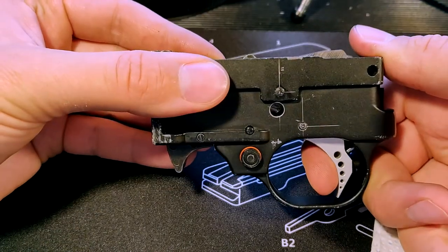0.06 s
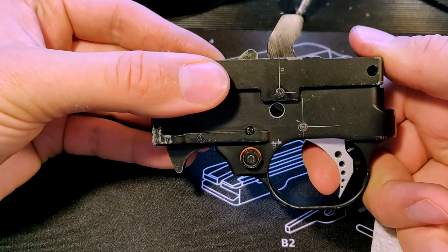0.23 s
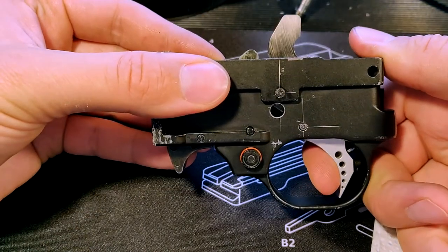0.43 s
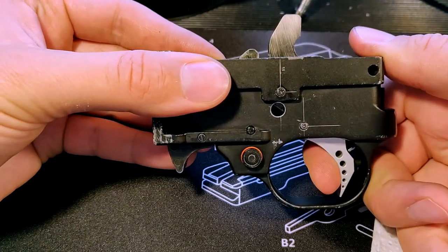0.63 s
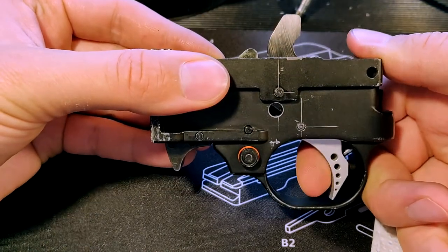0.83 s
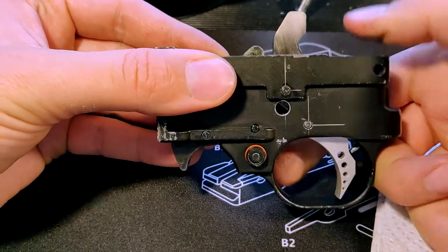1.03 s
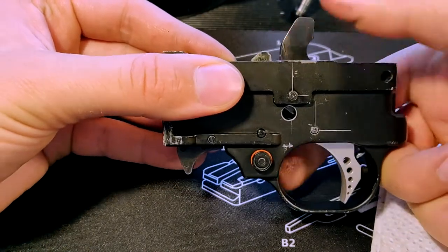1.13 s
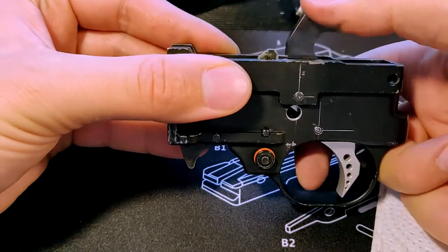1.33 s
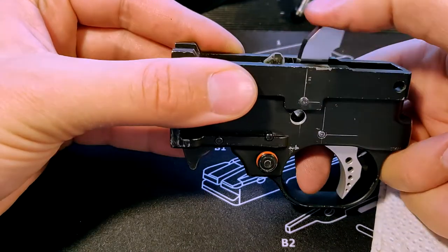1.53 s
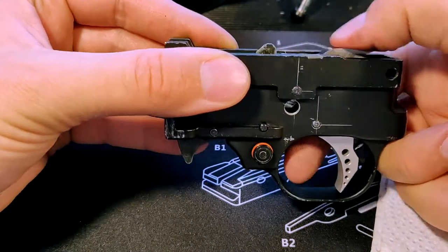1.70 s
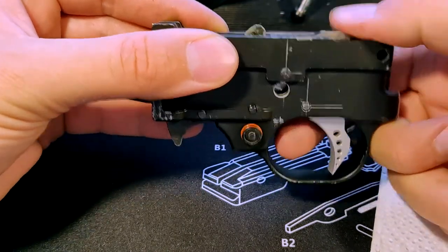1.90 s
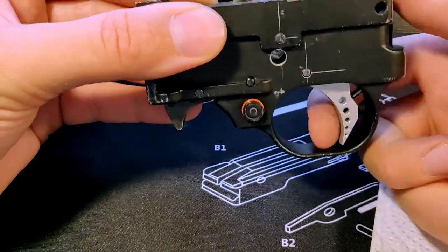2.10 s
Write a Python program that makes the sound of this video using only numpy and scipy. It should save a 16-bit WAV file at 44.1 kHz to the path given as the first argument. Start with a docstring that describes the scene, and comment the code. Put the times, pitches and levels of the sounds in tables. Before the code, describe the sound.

Sharp steel hammer snap, chattering and overloading the close microphone, with a short room echo; after a quiet pause, soft handling, a crisp cocking click, a lower reset click and a dull grip bump over faint hiss.

```python
"""A hammer in a small steel trigger mechanism falls, chatters on its frame and overloads the recorder.
Held in the hands close to the microphone in a small room, it is then cocked with small ticks and a
latching click, and the trigger resets. Each metal contact is a short noise burst plus ringing sine waves.
Skin sliding on metal and handling are shaped noise. Hum is two sine waves; hiss, rumble and slow
air pressure are noise."""
import sys
import numpy as np
from scipy import signal
from scipy.fft import rfft, irfft, next_fast_len
from scipy.io import wavfile

SR = 44100
rng = np.random.default_rng(int(sys.argv[2]) if len(sys.argv) > 2 else 0)


def store_pcm(level_fs):
    """Save levels as 16-bit WAV."""
    pcm = np.round(np.clip(level_fs, -1, 1) * 32767).astype(np.int16)
    wavfile.write(sys.argv[1], SR, np.atleast_2d(pcm).T)


N = 94815  # length in samples, about 2.15 s

# In all "contacts" tables, brightness tilts the sound up (+) or down (-) around 6000 Hz.
# Mode levels are starting points: brightness and a random change at each contact shift them.

# Steady hiss. Each row: frequency in Hz, relative level in dB.
HISS_SPECTRUM = [(100, 6), (400, 7), (700, 6.5), (1200, 4.5), (2200, -1.5), (4000, -2.5), (7000, -3.5),
                 (11000, -0.5), (13000, -4), (15700, -5)]
# Low room rumble. Each row: frequency in Hz, relative level in dB.
RUMBLE_SPECTRUM = [(15, -1), (30, 5), (55, -1.5), (80, -11.5), (130, -20), (220, -22), (500, -49.5)]
# Mains hum tones. Each row: frequency in Hz, rms level in dB.
HUM_TONES = [(49.8, -49), (100, -64.5)]
# Strength of slow air pressure on the microphone. Each row: time in seconds, level in dB.
AIR_LEVEL = [(0, -38), (1.3, -37), (1.55, -39.5), (1.7, -27), (1.85, -24.5), (2.0, -41), (2.15, -42)]
# Colour of that air pressure. Each row: frequency in Hz, relative level in dB.
AIR_SPECTRUM = [(1, -6), (4, 2.5), (10, -21.5), (20, -41), (60, -70), (200, -100)]
# Strength of the low handling noise. Each row: time in seconds, level in dB.
HANDLING_LEVEL = [(0, -65.5), (.5, -62.5), (.85, -59), (1.1, -56), (1.35, -56.5), (1.6, -64), (2.15, -63)]
# Colour of the handling noise. Each row: frequency in Hz, relative level in dB.
HANDLING_SPECTRUM = [(100, -24.5), (180, -5.5), (220, -5.5), (285, 3.5), (340, -6.5), (430, -17),
                     (1500, -42)]

# Hammer release, blow and rebounds. Each row: start in seconds, level in dB, brightness in dB per octave.
HAMMER_CONTACTS = [(.1977, -20, -2.5), (.2028, 0, 0.5), (.2092, 3.5, 1), (.2149, 3, 2.5), (.2205, -3.5, -2)]
# Dense clang of the frame. Each row: frequency in Hz, relative level in dB.
FRAME_CLANG = [(60, -18.5), (350, -18.5), (750, -24.5), (1300, -20), (1700, -21), (2400, -18.5),
               (3100, -13), (3600, -5), (4200, -11.5), (5200, -7.5), (7500, -8.5), (10000, -6), (11900, 3),
               (13400, -6), (15500, -6.5)]
# Ring of the hammer and the frame it strikes, strongest near 3.6 kHz. Each row: frequency in Hz, level in dB,
# time to fall 60 dB in seconds.
HAMMER_RING = [(2870, -7.5, .09), (3532, 3, .1), (3630, 5.5, 0.05), (3994, -13, .2), (5749, -14, .18),
               (6342, -13, .13), (8730, -8, .14), (11220, -7, .15), (12200, -4, 0.14), (11640, -7, .17),
               (12030, -3, .17), (12210, -5, .19), (12930, -13.5, 0.14), (14900, -8, .15)]
# The blow jolts the whole frame. Each row: start in seconds, level in dB, brightness in dB per octave.
JOLT_CONTACTS = [(.209, -36, -1)]
# Colour of the jolt. Each row: frequency in Hz, relative level in dB.
JOLT_SPECTRUM = [(20, -8.5), (45, -0.5), (120, -3), (250, -9), (600, -28.5), (2000, -61)]
# Low ring of the frame in the hands. Each row: frequency in Hz, level in dB, time to fall 60 dB in seconds.
JOLT_RING = [(60, -0.5, .25), (123, -3, .2)]
# Spring ping as its load changes. Each row: start in seconds, level in dB, brightness in dB per octave.
SPRING_CONTACTS = [(.7615, -49, 4)]
# Colour of the ping's noise burst. Each row: frequency in Hz, relative level in dB.
SPRING_SPECTRUM = [(1000, -5), (2800, -7), (3900, 0), (5200, -9), (7600, -9), (10000, -19), (15000, -10)]
# Ring of the spring. Each row: frequency in Hz, level in dB, time to fall 60 dB in seconds.
SPRING_RING = [(2030, 9.5, 0.036), (3580, 3.5, 0.055), (4120, -4, .04), (5740, -5.5, .08)]
# Skin sliding over metal. Each row: middle in seconds, width (standard deviation) in seconds,
# level at the middle in dB, brightness in dB per octave.
SKIN_RUBS = [(0.997, 0.019, -54, -5.5), (1.038, 0.021, -52.5, 0), (1.2, 0.14, -64.5, -2.5),
             (1.68, 0.036, -59, -0.5), (1.815, 0.039, -56, 1.5), (1.99, 0.03, -60.5, -7),
             (2.107, 0.012, -54, 0.5)]
# Colour of the sliding skin. Each row: frequency in Hz, relative level in dB.
SKIN_SPECTRUM = [(300, -20), (650, -6.5), (1050, 3.5), (2500, -2.5), (4000, 0), (7500, -2), (11500, 0.5),
                 (15500, -10.5)]
# Soft tick as the hammer starts to turn. Each row: start in seconds, level in dB, brightness in dB per octave.
PIVOT_CONTACTS = [(1.4525, -49.5, 1)]
# Colour of the pivot tick. Each row: frequency in Hz, relative level in dB.
PIVOT_SPECTRUM = [(1000, -22), (3000, -15), (3900, 6), (4700, -8), (5600, -16), (15000, -22)]
# Ring of the pivot. Each row: frequency in Hz, level in dB, time to fall 60 dB in seconds.
PIVOT_RING = [(3580, 3, .06), (4200, -6, 0.045), (4600, -9, .03)]
# Sear (catch) clicks in cocking. Each row: start in seconds, level in dB, brightness in dB per octave.
SEAR_CONTACTS = [(1.5435, -44, -1.5), (1.586, -51, -5), (1.6125, -54, -3.5), (1.6672, -41, -4.5),
                 (1.6835, -46, -1.5), (1.6995, -36, 6.5), (1.7137, -22, 1), (1.7215, -30, 4.5)]
# Colour of the sear clicks. Each row: frequency in Hz, relative level in dB.
SEAR_SPECTRUM = [(150, -24), (550, -30), (850, -5), (1400, -9.5), (2500, -7), (3600, 0), (5000, 4.5),
                 (6700, 2), (7600, -4.5), (10300, -4.5), (12000, -6), (14500, -10), (16000, -17)]
# Ring of the sear. Each row: frequency in Hz, level in dB, time to fall 60 dB in seconds.
SEAR_RING = [(2117, 3, 0.027), (2490, 8, 0.014), (4150, 2, 0.084), (4950, 9, 0.039), (5470, 1, .04),
             (5660, -6, .045), (6700, 1, .045), (6780, -0.5, 0.053)]
# Clicks of the trigger resetting. Each row: start in seconds, level in dB, brightness in dB per octave.
TRIGGER_CONTACTS = [(1.9019, -20, -1.5), (1.9098, -33.5, 2.5), (1.925, -44, 18)]
# Colour of the trigger clicks. Each row: frequency in Hz, relative level in dB.
TRIGGER_SPECTRUM = [(150, -7), (550, -23), (900, 2.5), (1500, -17.5), (2000, -3.5), (2800, 0), (3700, 9.5),
                    (4700, -8), (6000, -9), (7500, -16), (9000, -11.5), (11700, -17.5), (15000, -34)]
# Ring of the trigger. Each row: frequency in Hz, level in dB, time to fall 60 dB in seconds.
TRIGGER_RING = [(850, -0.5, 0.021), (2090, -19, 0.033), (2950, 1, 0.024), (3380, -14, 0.026),
                (3600, 5.5, 0.04), (3927, -7, 0.046), (5730, -18, 0.094)]
# Dull bump as the grip shifts. Each row: start in seconds, level in dB, brightness in dB per octave.
BUMP_CONTACTS = [(2.031, -40, 1)]
# Colour of the bump. Each row: frequency in Hz, relative level in dB.
BUMP_SPECTRUM = [(100, -18), (290, -1.5), (550, -2.5), (800, -13), (1150, -5), (2200, -34), (4500, -27.5),
                 (12000, -32.5)]
# Ring of the bump. Each row: frequency in Hz, level in dB, time to fall 60 dB in seconds.
BUMP_RING = [(277, 2, .07), (327, 4.5, 0.064), (476, -1.5, 0.021), (1110, -20, 0.055), (1650, -20, 0.03)]

# How fast the room's echo dies. Each row: frequency in Hz, time to fall 60 dB in seconds.
ROOM_DECAY = [(200, 0.13), (500, 0.11), (1500, 0.24), (4000, 0.25), (9000, .245), (12500, 0.21),
              (15500, .235)]
# Colour of the room's echo. Each row: frequency in Hz, relative level in dB.
ROOM_SPECTRUM = [(200, -5.5), (600, -3.5), (1200, 1), (4000, -1.5), (12000, -1), (16000, -2)]

ROOM_BUILD_S = 0.0034  # time for the diffuse echo to build up
WALL_DELAY_S, WALL_DB = 0.0077, -11.5  # echo from one near wall
CRACK_DB, CRACK_T60_S = -5, 0.0018  # first instant of each contact, added to its clang
CLIP_TOP, CLIP_KNEE = 0.98, 7.6  # recorder's ceiling; a higher knee bends more sharply
TOP_HZ, EDGE_HZ = 15900, 250  # highest frequency kept, and the width of the fade just below it


def amp(db):
    """Turn decibels into a gain."""
    return 10 ** (np.asarray(db) / 20)


def unit(x):
    """Scale a sound to an average (rms) strength of 1."""
    return x / np.sqrt(np.mean(x ** 2) + 1e-20)


def along(points, hz):
    """Read a (frequency, value) curve on a logarithmic frequency axis."""
    f, v = np.transpose(points)
    return np.interp(np.log(hz + 1), np.log(f + 1), v)


def curve(rows):
    """Join (seconds, value) points into one value per sample."""
    return np.interp(np.arange(N) / SR, *np.transpose(rows))


def filtered(x, response):
    """Multiply each frequency in a sound by the given response."""
    size = next_fast_len(len(x) + 8192)
    hz = np.fft.rfftfreq(size, 1 / SR)
    return irfft(rfft(x, size) * response(hz), size)[:len(x)]


def tilt(hz, slope):
    """Give a brightness slope in dB around 6000 Hz, level below 500 Hz."""
    return slope * np.log2(np.maximum(hz, 500) / 6000)


def noise(spectrum, slope=0, size=N):
    """Colour random noise with a spectrum and a brightness slope, at rms 1."""
    white = rng.standard_normal(size)
    return unit(filtered(white, lambda hz: amp(along(spectrum, hz) + tilt(hz, slope))))


def room(x, wet_db):
    """Add one near-wall echo and a diffuse tail whose frequencies die away at different speeds."""
    hz, t, z = signal.stft(rng.standard_normal(SR // 2), SR, nperseg=256)
    decay_db = along(ROOM_SPECTRUM, hz)[:, None] - 60 * t / along(ROOM_DECAY, hz)[:, None]
    tail = signal.istft(z * amp(decay_db), SR, nperseg=256)[1]
    tail *= 1 - np.exp(-np.arange(len(tail)) / SR / ROOM_BUILD_S)
    tail /= np.linalg.norm(tail)
    # Turning the phase in step with frequency delays the sound.
    wall = amp(WALL_DB) * filtered(x, lambda f: np.exp(-2j * np.pi * f * WALL_DELAY_S))
    return x + wall + amp(wet_db) * signal.fftconvolve(x, tail)[:len(x)]


def strikes(contacts, spectrum, modes, t60, ring_db, wet_db):
    """Make each contact crack and clang as fading noise, and ring the part as fading sine waves."""
    out = np.zeros(N + SR)
    t = np.arange(SR // 2) / SR
    fade = amp(-60 * t / t60) + amp(CRACK_DB - 60 * t / CRACK_T60_S)
    for start, db, slope in contacts:
        clang = noise(spectrum, slope, size=len(t)) * fade
        ring = np.zeros(len(t))
        for hz, level, life in modes:
            mode_db = level + tilt(hz, slope) + rng.normal(0, 4)  # each contact rings a little differently
            ring += amp(mode_db - 60 * t / life) * np.sin(2 * np.pi * (hz * t + rng.random()))
        out[round(start * SR):][:len(t)] += amp(db) * room(clang + amp(ring_db) * ring, wet_db)
    return out[:N]


def mains_hum():
    """Steady sine waves with random starting phases."""
    t = np.arange(N) / SR
    hum = np.zeros(N)
    for hz, db in HUM_TONES:
        hum += amp(db) * np.sqrt(2) * np.sin(2 * np.pi * (hz * t + rng.random()))  # root 2: rms to peak
    return hum


def hiss():
    """Steady coloured noise."""
    return amp(-62) * noise(HISS_SPECTRUM)


def rumble():
    """Steady low noise of the room."""
    return amp(-47.5) * noise(RUMBLE_SPECTRUM)


def air_pressure():
    """Slow air pressure on the microphone, as very low noise of changing strength."""
    return amp(curve(AIR_LEVEL)) * noise(AIR_SPECTRUM)


def handling():
    """Low noise of the hands, slowly changing in strength."""
    return amp(curve(HANDLING_LEVEL)) * noise(HANDLING_SPECTRUM)


def hammer():
    """The hammer is released, hits the frame and rebounds, making metal clang and ring."""
    return strikes(HAMMER_CONTACTS, FRAME_CLANG, HAMMER_RING, t60=0.032, ring_db=-22, wet_db=-3)


def frame_jolt():
    """The blow shakes the whole frame in the hands as a low thud and ring."""
    return strikes(JOLT_CONTACTS, JOLT_SPECTRUM, JOLT_RING, t60=0.2, ring_db=-3, wet_db=-8.5)


def spring_ping():
    """A spring rings faintly as the load on it changes."""
    return strikes(SPRING_CONTACTS, SPRING_SPECTRUM, SPRING_RING, t60=0.038, ring_db=-6, wet_db=-6)


def skin_rubs():
    """Skin slides over metal as noise that swells and fades in bell shapes."""
    t = np.arange(N) / SR
    rubs = np.zeros(N)
    for middle, width, db, slope in SKIN_RUBS:
        swell = np.exp(-0.5 * ((t - middle) / width) ** 2)
        rubs += amp(db) * swell * noise(SKIN_SPECTRUM, slope)
    return rubs


def pivot_tick():
    """The hammer's pivot ticks and rings softly as it starts to turn."""
    return strikes(PIVOT_CONTACTS, PIVOT_SPECTRUM, PIVOT_RING, t60=0.021, ring_db=-8.5, wet_db=-7)


def sear_clicks():
    """The sear, a small catch, clicks and rings while the hammer is cocked."""
    return strikes(SEAR_CONTACTS, SEAR_SPECTRUM, SEAR_RING, t60=0.022, ring_db=-18.5, wet_db=-7.5)


def trigger_reset():
    """The trigger clicks and rings briefly as it resets."""
    return strikes(TRIGGER_CONTACTS, TRIGGER_SPECTRUM, TRIGGER_RING, t60=0.014, ring_db=-16.5, wet_db=-8.5)


def grip_bump():
    """The shifting grip gives a dull bump and a short low ring."""
    return strikes(BUMP_CONTACTS, BUMP_SPECTRUM, BUMP_RING, t60=0.025, ring_db=-2, wet_db=-5.5)


def scene():
    """Add everything together at one microphone."""
    fall = hammer() + frame_jolt()
    catch = sear_clicks() + trigger_reset()
    small_parts = spring_ping() + pivot_tick()
    hands = grip_bump() + skin_rubs() + handling()
    background = mains_hum() + hiss() + rumble() + air_pressure()
    return (fall + catch + small_parts + hands + background)[None]


def record(dry):
    """Loud peaks are smoothly flattened, then a steep low-pass removes everything above 15900 Hz."""
    overload = np.abs(dry[0] / CLIP_TOP) ** CLIP_KNEE
    clipped = dry[0] / (1 + overload) ** (1 / CLIP_KNEE)

    def low_pass(hz):
        """Fade smoothly to nothing at the highest frequency kept."""
        return np.sin(np.pi / 2 * np.clip((TOP_HZ - hz) / EDGE_HZ, 0, 1)) ** 2

    return filtered(clipped, low_pass)[None]


dry = scene()
out = record(dry)
store_pcm(out)
```